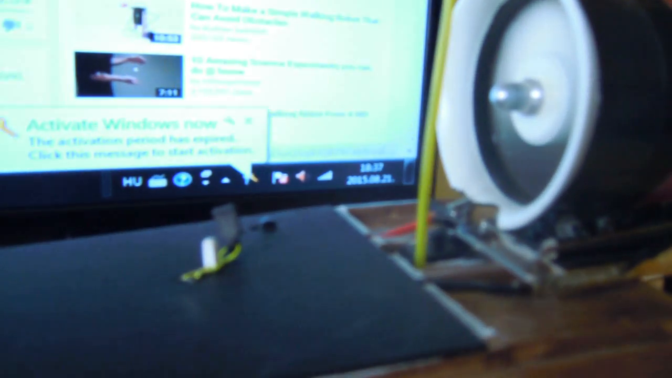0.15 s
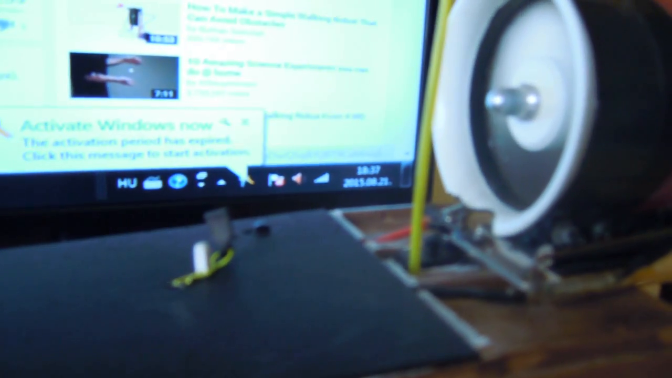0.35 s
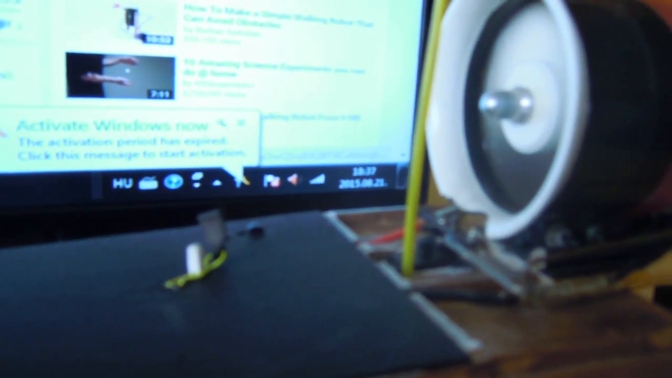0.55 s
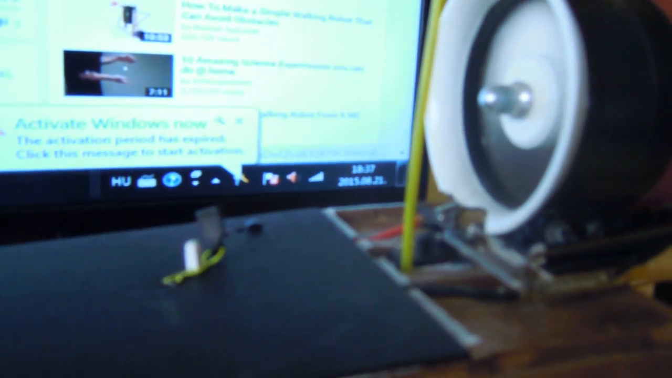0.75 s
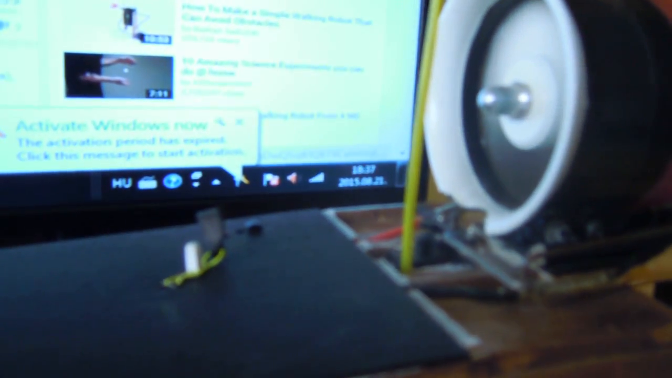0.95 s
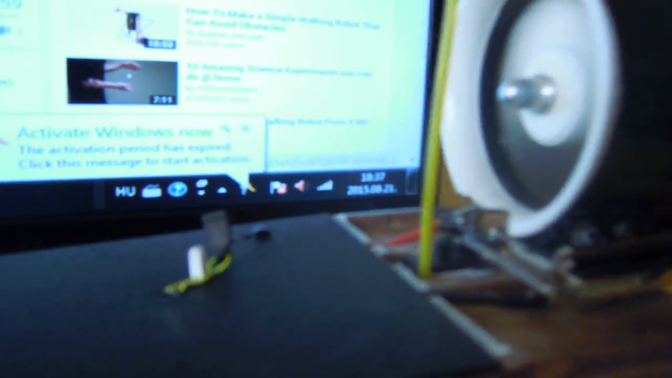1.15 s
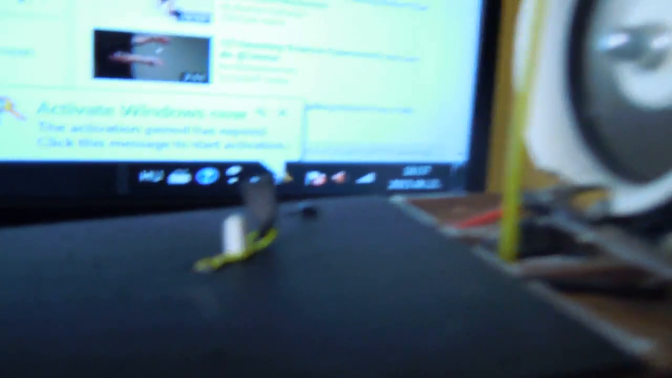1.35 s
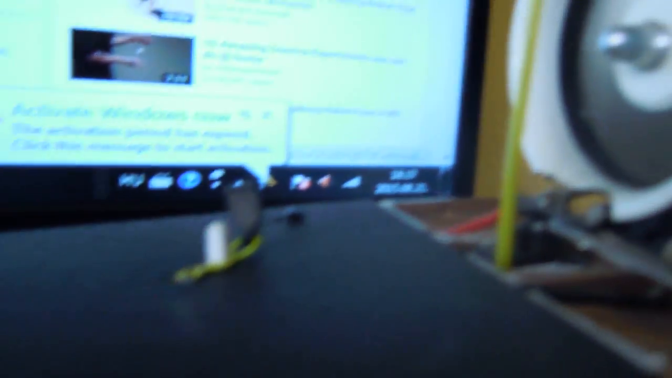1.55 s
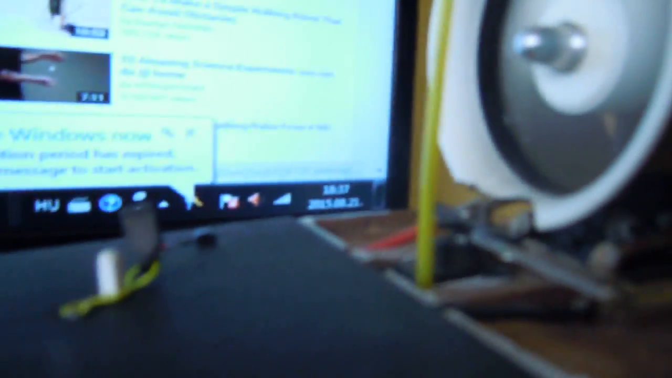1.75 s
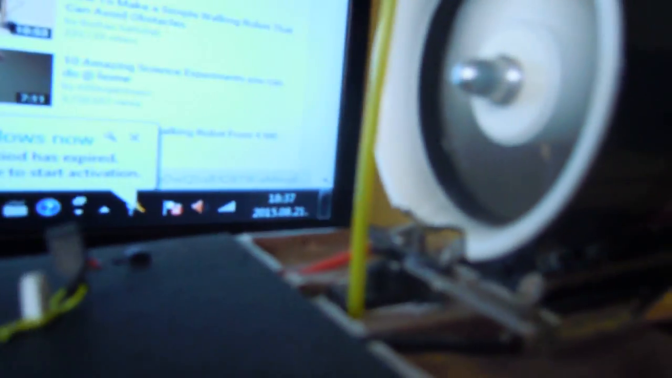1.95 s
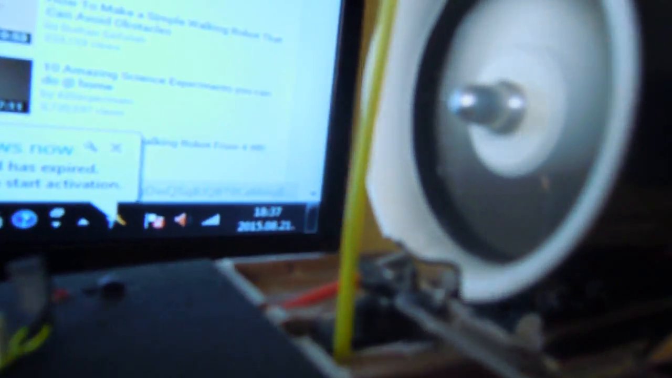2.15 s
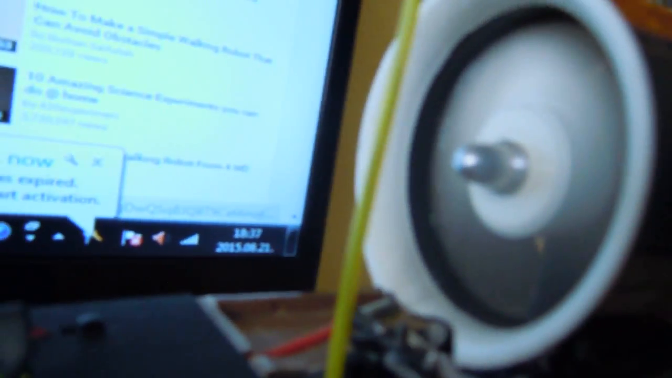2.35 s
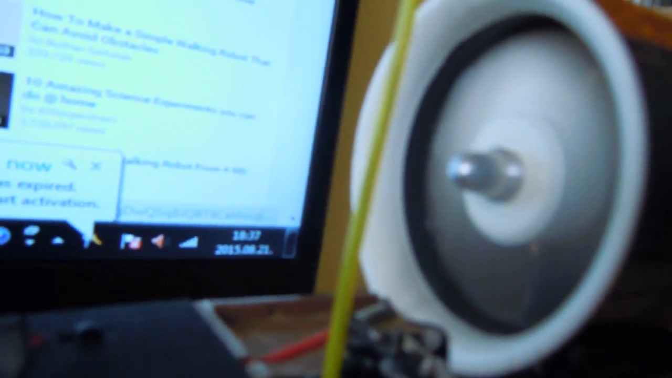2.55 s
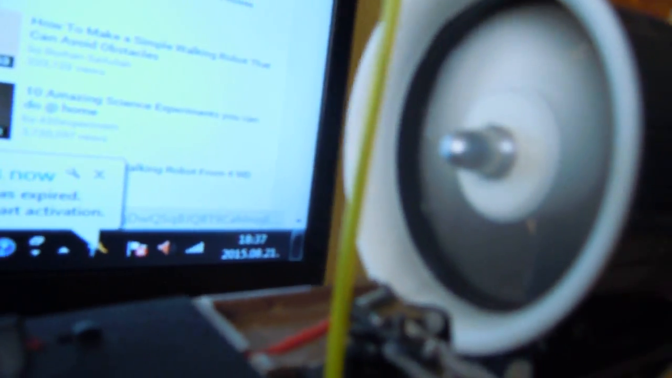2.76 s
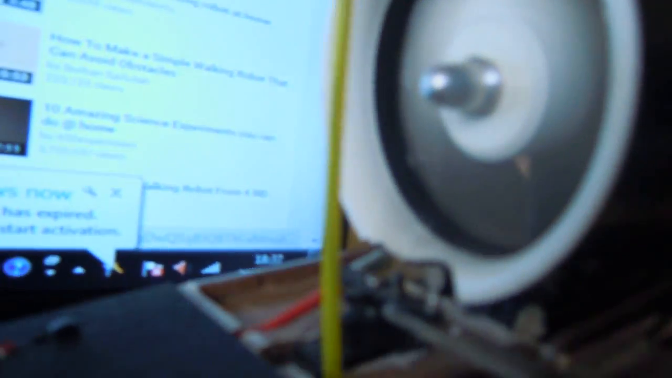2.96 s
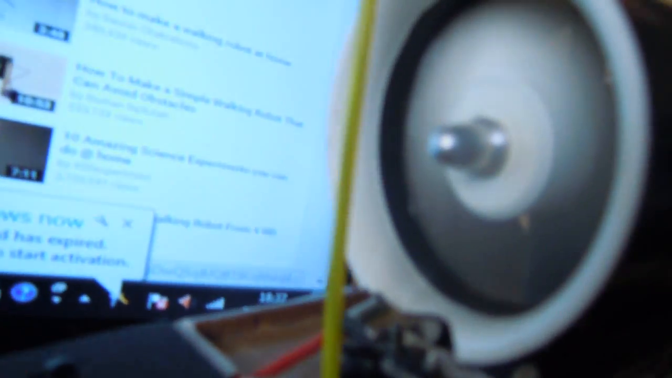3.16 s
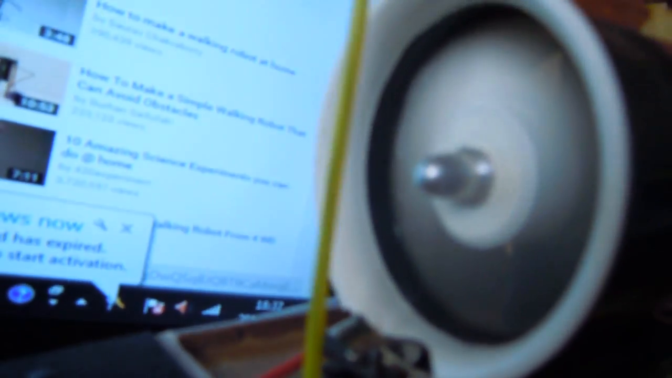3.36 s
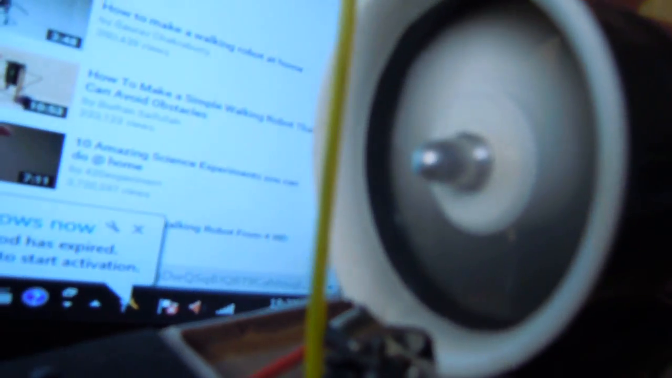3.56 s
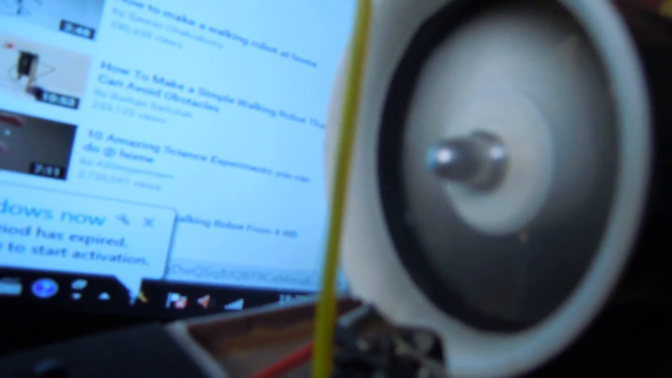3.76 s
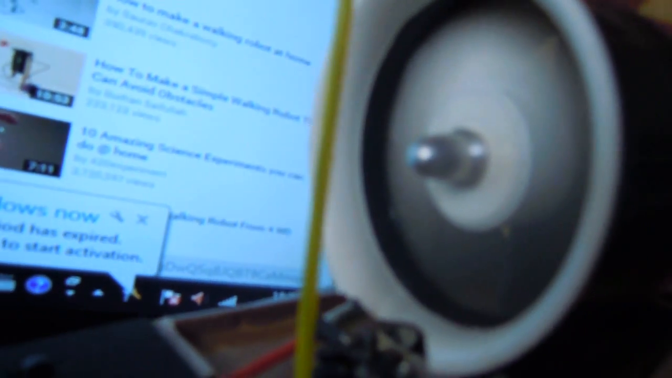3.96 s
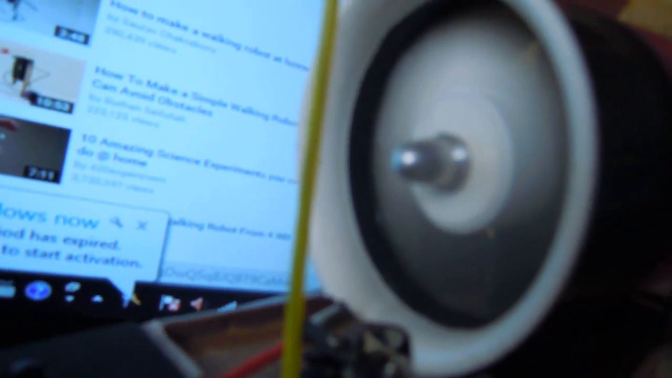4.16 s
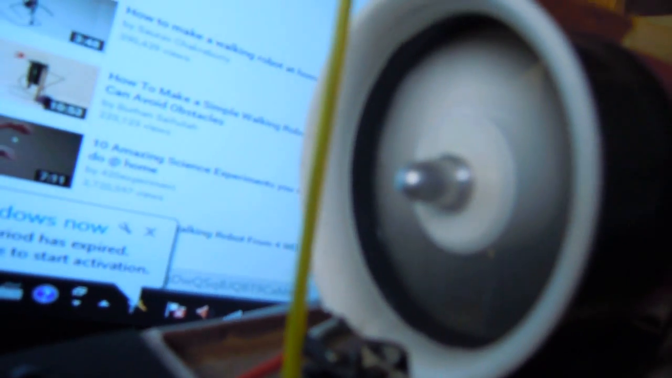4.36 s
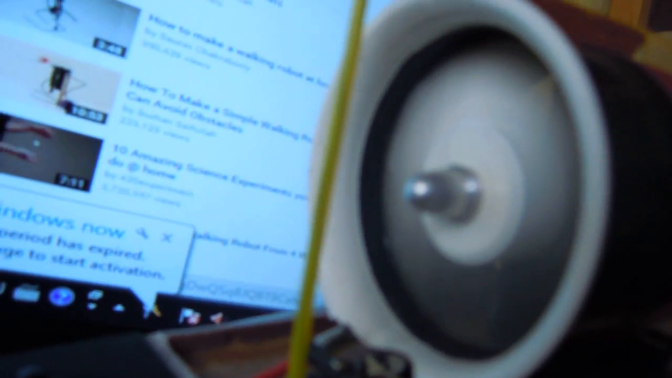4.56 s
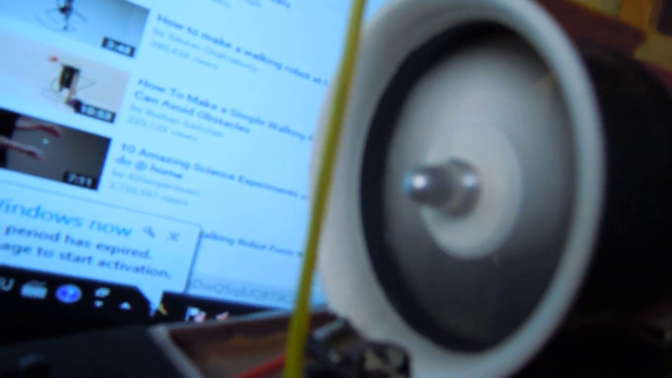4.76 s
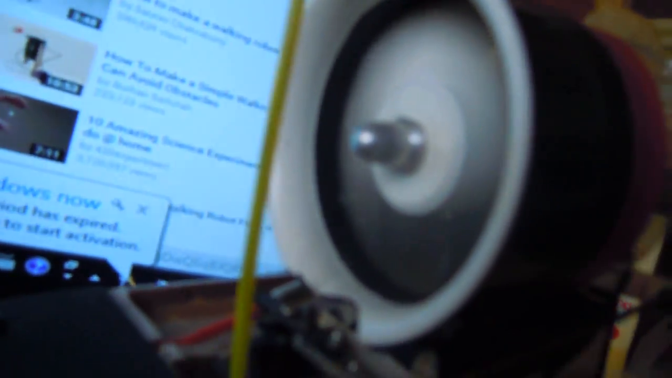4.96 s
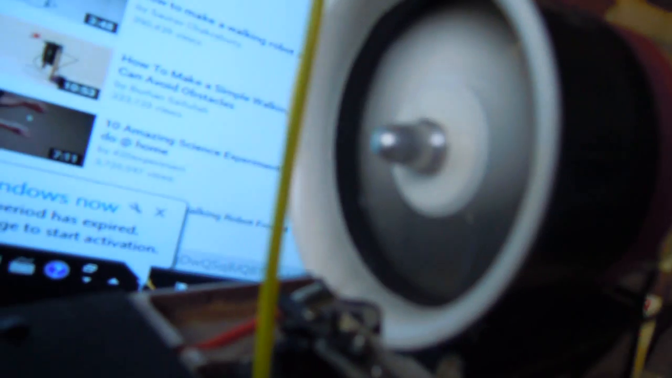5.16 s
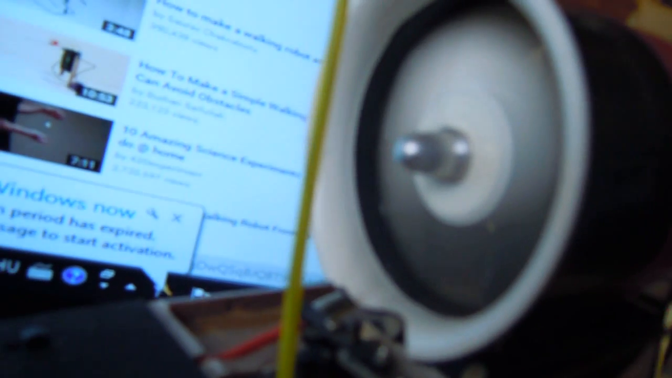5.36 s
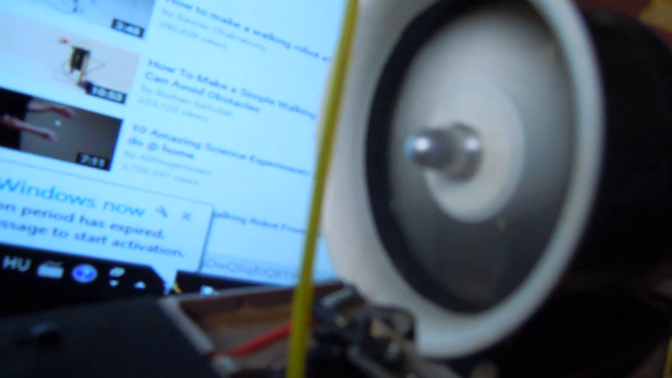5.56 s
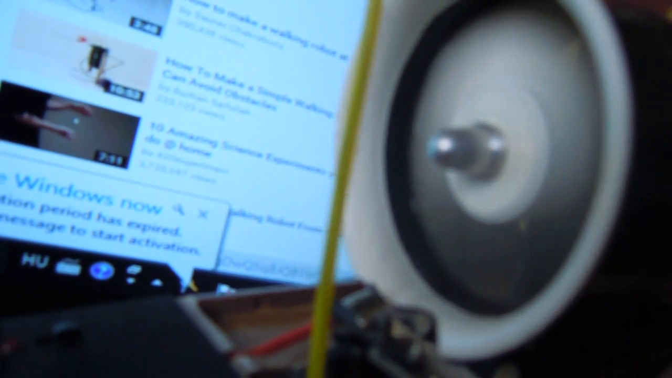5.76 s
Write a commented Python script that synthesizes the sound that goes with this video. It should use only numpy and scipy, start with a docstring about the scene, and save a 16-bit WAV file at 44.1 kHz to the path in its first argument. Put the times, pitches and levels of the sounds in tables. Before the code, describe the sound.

A small electric motor spins a model jet fan on a desk, close to the microphone. It starts as a buzzing hum with a light rattle and bright hiss, then rises a little and smooths out. Near the middle it jumps to full power, with a loud, piercing whine and stronger airy hiss that hold to the end. A hand softly bumps the microphone just after the jump.

```python
"""Model jet fan on a desk

A small brush motor is turned up in steps: a hum with a light rattle, a smoother hum, then full power
with a piercing whine at twelve times the shaft speed. Every tone is a harmonic of the rotation, and a
bright hiss of brushes and air pulses with each turn. Midway a hand softly bumps the camera close by."""
import sys
import numpy as np
from scipy import signal
from scipy.fft import rfft, irfft, next_fast_len
from scipy.io import wavfile

SR = 44100
rng = np.random.default_rng(int(sys.argv[2]) if len(sys.argv) > 2 else 0)


def log_audio(samples):
    """Write samples as a 16-bit WAV file to the path given in sys.argv[1]."""
    # one column per channel
    frames = np.atleast_2d(samples).T
    # limit to full scale, then quantise
    limited = np.clip(frames, -1, 1)
    pcm = np.round(limited * 32767).astype(np.int16)
    wavfile.write(sys.argv[1], SR, pcm)


N = 260190
TIME = np.arange(N) / SR


# throttle moves: (time [s], change of shaft speed [turns/s], rotor lag [s])
THROTTLE = [(.305, 2.12, .033), (.865, 8.71, .047), (2.602, 21.74, .053), (2.658, 17.0, .022),
            (5.58, -.65, .015)]
# slow wander of the shaft: (time [s], speed offset [turns/s])
WANDER = [(2.35, .05), (2.55, -.4), (2.75, 0), (3.05, -.15), (3.5, .38), (4.45, .3), (4.8, -.15), (5.05, 0),
          (5.3, -.25)]
def shaft_speed():
    """Critically damped step response: the rotor eases to each new speed, in turns per second."""
    speed = 95.3 + curve(WANDER)
    for start, change, lag in THROTTLE:
        age = np.maximum(TIME - start, 0) / lag
        speed += change * (1 - (1 + age) * np.exp(-age))
    return speed


def motor_strain(speed, heavy_acceleration=36):
    """Inertial load, 0 to 1: acceleration [turns/s^2] draws heavy current, and strain soon follows."""
    acceleration = np.maximum(np.gradient(speed) * SR, 0)
    load = np.tanh(acceleration / heavy_acceleration)
    return lagged(lagged(load, lag_s=.02), lag_s=.02)


# whine at low, middle and full power: (base level [dB])
WHINE_DB = [-36.5, -33.5, -14.5]
# swell of the whine: (time [s], level offset [dB])
WHINE_SWELL = [(2.85, -0.8), (3.05, 0.7), (3.38, -0.3), (3.8, .5), (4.0, -0.5), (4.3, .1), (4.68, -0.8),
               (5.25, 0.5), (5.55, -0.1), (5.78, 0.5)]
def whine(angle, shares, strain, wobble_rad=.38, throb=.13, sag_db=.5):
    """Phase and amplitude modulation: the poles tug the rotor twice a turn, shaking harmonic 12."""
    level_db = np.array(WHINE_DB) @ shares - sag_db * strain + curve(WHINE_SWELL) + .26 * drift(41)
    tugged = angle + wobble_rad * np.sin(2 * angle) / 12
    return harmonic(tugged, 12, level_db) * (1 + throb * np.cos(2 * angle))


# octave of the whine: (time [s], base level [dB])
OCTAVE_SWELL = [(.3, -35.5), (.55, -32.5), (.9, -33.5), (1.08, -27), (1.45, -28.5), (2.55, -32),
                (2.9, -24.5), (3.2, -27), (3.35, -29.5), (4.5, -34), (4.8, -27.5), (5.9, -27)]
def whine_octave(angle, strain, rise_db=3):
    """The whine's second harmonic swells and fades by itself, and rises under strain."""
    level_db = curve(OCTAVE_SWELL) + rise_db * strain - break_depth_db() + .52 * drift(40)
    return harmonic(angle, 24, level_db)


# hum at low, middle and full power: (base level [dB])
HUM_DB = [-21.5, -21.5, -20]
# swell of the hum: (time [s], level offset [dB])
HUM_SWELL = [(.4, 0), (.7, -1), (1.45, 0.6), (2.35, 0.5), (2.55, -0.5), (3.2, -1.3), (4.2, .6), (4.9, 0),
             (5.55, .7), (5.75, -1.5)]
# brief dips as the speed climbs: (time [s], depth [dB], half width [s])
HUM_DIPS = [(1.0, 2.5, .035), (2.722, 5, 0.011), (2.808, 10, .03)]
def hum(angle, shares, strain, sag_db=1):
    """Periodic forcing: two pulses a turn give a low tone, which sinks under strain."""
    level_db = np.array(HUM_DB) @ shares - sag_db * strain + curve(HUM_SWELL) + .25 * drift(2.7)
    dips_db = sum(depth * bell(time, width) for time, depth, width in HUM_DIPS)
    return harmonic(angle, 2, level_db - dips_db)


# weaker partials: (order, rounded in use [cycles/turn], base level at low, middle, full power [dB])
BUZZ_PARTIALS = [(1, -53.5, -45.5, -43), (3, -38.5, -41.5, -35.5), (4, -40.5, -47.5, -29.5),
                 (5, -43, -49, -38), (6, -45.5, -35.5, -33.5), (7, -49, -41, -43), (8, -43, -46.5, -39.5),
                 (9, -44, -64, -52), (10, -31.5, -37, -59), (11, -47, -42.5, -45), (14, -42, -50, -56),
                 (15, -44, -60, -37), (16, -64, -53, -43), (18, -40, -39, -30.5), (20, -39, -52, -30),
                 (22, -44, -83, -41), (26, -40, -34.5, -32.5), (30, -38, -51, -33.5),
                 (32, -47.5, -46.5, -34.5), (34, -56, -49, -32.5), (36, -41, -43, -25.5),
                 (38, -43, -50, -31), (40, -59, -61, -39), (42, -47, -51, -31.5), (44, -46, -49, -51),
                 (46, -49, -40, -37), (48, -47, -44, -32), (50, -40.5, -41, -29), (52, -52, -44, -30),
                 (54, -50, -37, -30), (56, -49, -37, -25), (58, -40, -54, -27), (60, -45, -52, -31),
                 (62, -41, -45, -35), (66.1, -49, -48, -39), (68.3, -40, -60, -49), (69, -39, -42, -45),
                 (78.5, -35, -36, -66)]
# growl of poles tugging unevenly under heavy current: (order [cycles/turn], boost at full strain [dB])
GROWL = [(4, 4.5), (6, 7), (10, 3.5), (14, 2), (16, 10), (36, 3.5)]
def buzz(angle, shares, strain, waver_db=.6, flutter_db=1.18, stutter_db=2.3):
    """Fourier series: no two parts of a turn are alike, so many shaft harmonics sound, each wavering."""
    out = np.zeros(N)
    for order, *levels_db in BUZZ_PARTIALS:
        order = round(order)
        level_db = np.array(levels_db) @ shares + strain * dict(GROWL).get(order, 0)
        firmness = from_db(max(levels_db) + 33.5)   # strong partials hold steadier than weak ones
        unrest_db = (waver_db * drift(4.2) + flutter_db * drift(16)) * 2 / (1 + firmness)
        unrest_db += stutter_db * strain * drift(44)
        out += harmonic(angle, order, level_db + unrest_db)
    return from_db(-.48 - break_depth_db()) * out


# breaks in the big climb: (time [s])
BREAK_TIMES = [2.668, 2.724]
def break_depth_db():
    """Brief attenuation: the buzz and the octave break off for a moment."""
    return 7.5 * sum(bell(time, half_width_s=.0087) for time in BREAK_TIMES)


# hiss spectrum: (frequency [Hz], relative density at low, middle, full power [dB])
HISS_SPECTRUM = [(25, -62, -62, -59), (100, -70, -74, -66), (295, -66, -69, -63), (686, -63, -68.5, -60),
                 (1280, -60, -63, -62.5), (1810, -59.5, -60, -58.5), (2660, -57, -59, -57),
                 (3420, -58.5, -64, -59.5), (4260, -57, -57.5, -55), (5440, -52.5, -54.5, -54),
                 (7230, -48.5, -49, -51.5), (8000, -51, -50, -49.5), (9180, -49.5, -51, -50),
                 (10380, -55.5, -54, -53.5), (10600, -57.5, -59, -55), (11310, -75, -74.5, -76.5)]
# hiss at low, middle and full power: (gain [dB])
HISS_DB = [-7, -5.5, 0.05]
def hiss(angle, shares, strain):
    """Amplitude-modulated noise: brush friction and rushing air swell in step with the rotor."""
    full_power = shares[-1]
    pulsing = 2 + .059 * harmonic(angle, 1, 3) + .23 * harmonic(angle, 2, -3)
    pulsing += .076 * full_power * harmonic(angle, 12, -13)
    grain = from_db(.51 * drift(120))
    friction = unit_rms(rng.standard_normal(N) * pulsing * grain)
    hz, *spectra = np.transpose(HISS_SPECTRUM)
    air = sum(share * colour(friction, hz, spectrum) for share, spectrum in zip(shares, spectra))
    # below full power the brushes hiss louder after each strain, then settle
    surge_db = 4.5 * lagged(strain, lag_s=.33) * (1 - full_power)
    return from_db(np.array(HISS_DB) @ shares + surge_db + .56 * drift(1.5)) * air


# duct bands: (frequency [Hz], bandwidth [Hz], boost or cut [dB])
DUCT_BANDS = [(1820, 200, 1), (2920, 400, 3), (3570, 200, -1), (5980, 330, 3.5), (6940, 200, 3),
              (7900, 280, -1), (9800, 440, 2)]
def duct(air, loss_db=.8):
    """Duct resonance: the tube around the fan lifts some bands of the hiss and weakens others."""
    bands = sum((from_db(db) - 1) * resonance(air, hz, width) for hz, width, db in DUCT_BANDS)
    return from_db(-loss_db) * (air + bands)


# housing modes: (frequency [Hz], bandwidth [Hz], level at low power [dB])
HOUSING_MODES = [(864, 7, -38.5), (1145, 31, -44), (1414, 13, -50), (1800, 50, -39.5), (1940, 60, -40.5),
                 (2410, 38, -42.5), (2860, 77, -44), (3590, 120, -38)]
def rattle(angle, shares, spread_db=3.5):
    """Impact excitation: the loose shaft knocks unevenly twice a turn, and the housing rings."""
    half_turns = np.diff(np.floor(angle / np.pi), prepend=0)
    knocks = half_turns * rng.standard_normal(N) * from_db(spread_db * drift(11))
    ringing = sum(from_db(db) * unit_rms(resonance(knocks, hz, width)) for hz, width, db in HOUSING_MODES)
    return shares[0] * ringing   # the shaft settles once it spins faster


# handling bumps: (time [s], level before the envelope [dB], frequency [Hz], decay time [s])
BUMPS = [(3.032, -22, 172, 0.019), (3.037, -23, 900, 0.025), (3.093, -19.5, 1100, 0.022),
         (3.105, -39, 80, 0.045)]
def bumps(attack_s=.003):
    """Heavily damped vibration: a hand on the camera makes dull, quickly dying thuds."""
    out = np.zeros(N)
    for start, db, hz, decay in BUMPS:
        age = np.maximum(TIME - start, 0)
        envelope = (1 - np.exp(-age / attack_s)) * np.exp(-age / decay)
        band = resonance(rng.standard_normal(N), hz, width_hz=hz)
        thud = unit_rms(resonance(band, hz, width_hz=hz))
        out += from_db(db) * thud * envelope
    return out


def harmonic(angle, order, level_db):
    """Phase locking: a sine of `order` cycles a turn, at an rms level."""
    return np.sqrt(2) * from_db(level_db) * np.sin(order * angle + rng.uniform(0, 2 * np.pi))


def resonance(x, hz, width_hz):
    """Two-pole resonator with unit peak gain."""
    r = np.exp(-np.pi * width_hz / SR)
    feedback = [1, -2 * r * np.cos(2 * np.pi * hz / SR), r * r]
    return signal.lfilter(np.array([1, 0, -1]) * (1 - r * r) / 2, feedback, x)


def colour(white, hz, density_db):
    """Spectral shaping: give unit white noise a power density."""
    size = next_fast_len(N)
    bin_hz = np.maximum(np.arange(size // 2 + 1) * SR / size, 1)
    gain = from_db(np.interp(np.log(bin_hz), np.log(hz), density_db)) * np.sqrt(SR / 2)
    return irfft(rfft(white, size) * gain, size)[:N]


def drift(rate_hz, hop=40, run_in=2000):
    """Low-pass noise: a random fluctuation of unit rms."""
    r = np.exp(-2 * np.pi * rate_hz * hop / SR)
    white = rng.standard_normal(N // hop + run_in + 2)
    slow = signal.lfilter([1], [1, -2 * r, r * r], white)[run_in:]
    return np.interp(np.arange(N) / hop, np.arange(len(slow)), unit_rms(slow))


def lagged(x, lag_s):
    """First-order relaxation toward a control signal."""
    r = np.exp(-1 / (lag_s * SR))
    return signal.lfilter([1 - r], [1, -r], x)


def curve(rows):
    """Linear interpolation of (time [s], value) rows."""
    return np.interp(TIME, *np.transpose(rows))


def bell(time, half_width_s):
    """Gaussian pulse of height 1."""
    return np.exp(-((TIME - time) / half_width_s) ** 2)


def from_db(db):
    """Decibels to amplitude ratio."""
    return 10 ** (np.asarray(db) / 20)


def unit_rms(x):
    """Normalisation to unit power."""
    return x / np.sqrt(np.mean(x ** 2) + 1e-20)


# low, middle and full power: (shaft speed [turns/s])
STEP_SPEEDS = [97, 106, 143]
def scene():
    """Superposition: the fan's layers share one shaft angle, and speed blends the three power steps."""
    speed = shaft_speed()
    strain = motor_strain(speed)
    jitter = 1 + .00062 * drift(25)
    angle = 2 * np.pi * np.cumsum(speed * jitter) / SR
    shares = np.array([np.interp(speed, STEP_SPEEDS, step) for step in np.eye(len(STEP_SPEEDS))])
    tones = whine(angle, shares, strain) + whine_octave(angle, strain)
    tones += hum(angle, shares, strain) + buzz(angle, shares, strain)
    air = duct(hiss(angle, shares, strain))
    return (tones + air + rattle(angle, shares) + bumps())[None]


def record(dry):
    """Saturation and band limiting: the rare highest peaks are flattened and the top treble is cut."""
    ceiling, cutoff_hz = .75, 11450
    low_pass = signal.ellip(12, .05, 60, cutoff_hz, fs=SR, output="sos")
    return signal.sosfiltfilt(low_pass, np.clip(dry, -ceiling, ceiling))


dry = scene()
out = record(dry)
log_audio(out)
```